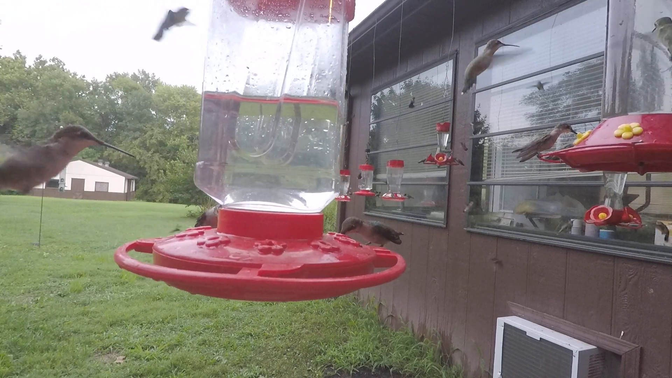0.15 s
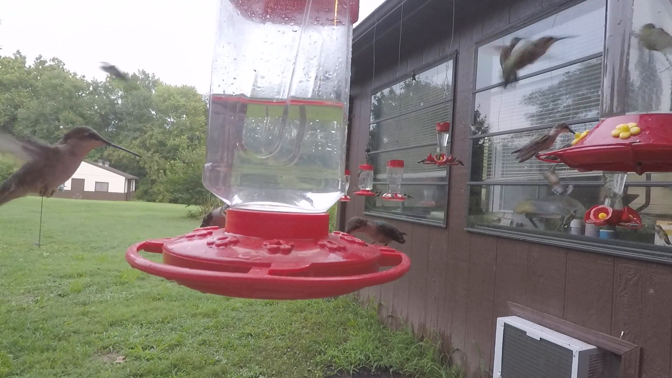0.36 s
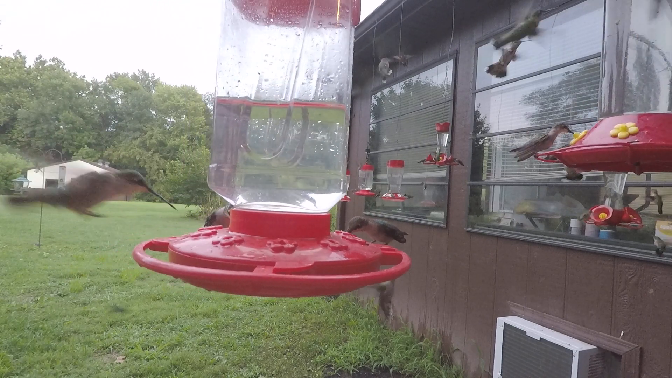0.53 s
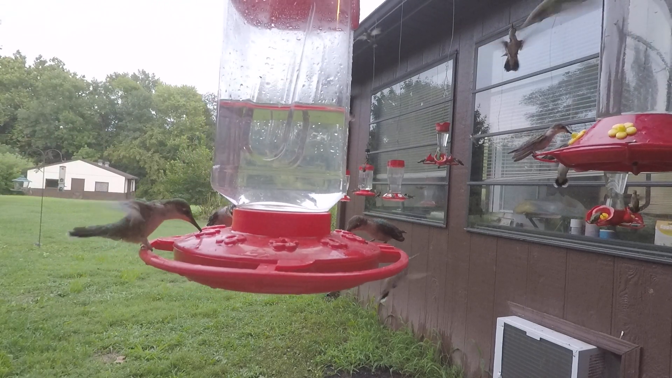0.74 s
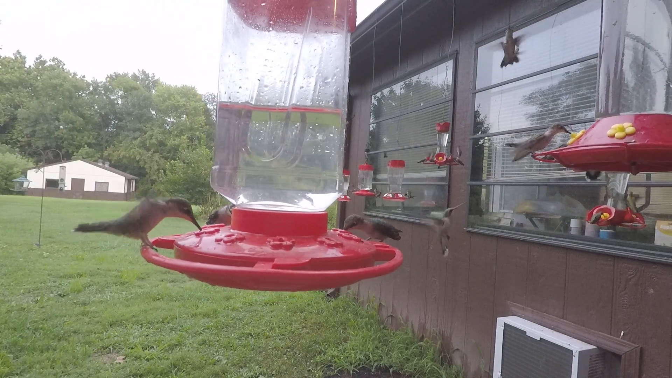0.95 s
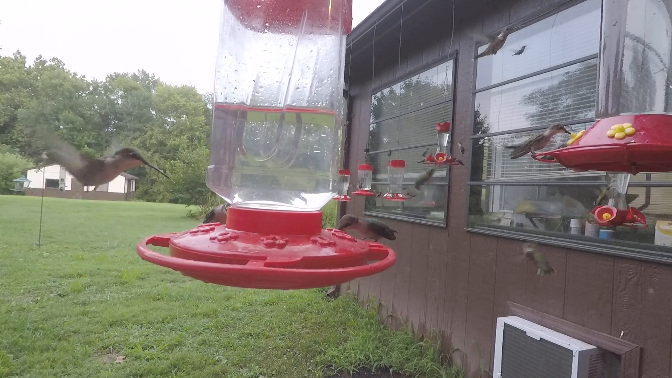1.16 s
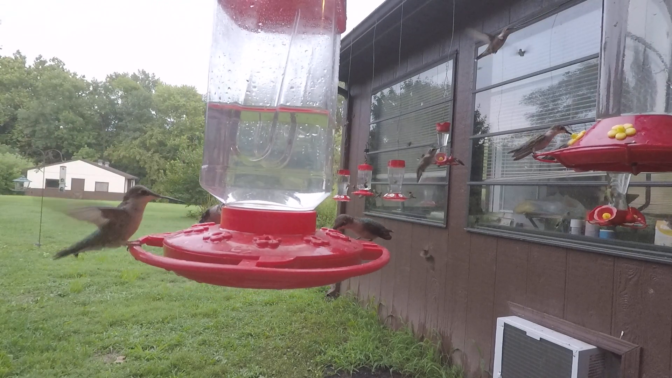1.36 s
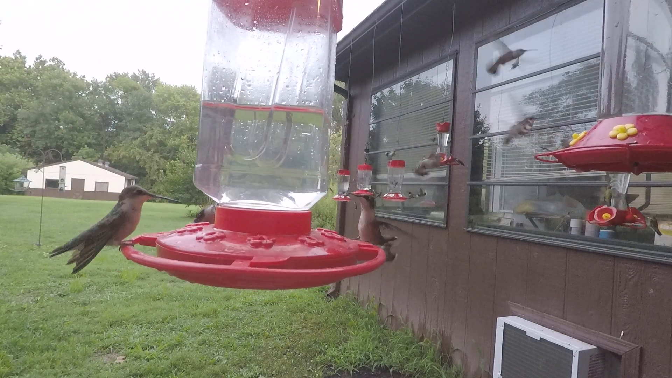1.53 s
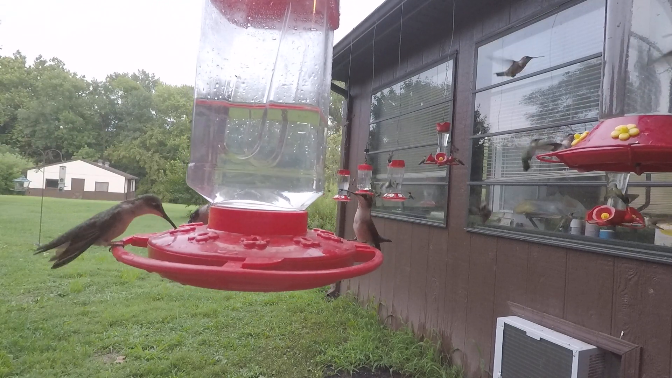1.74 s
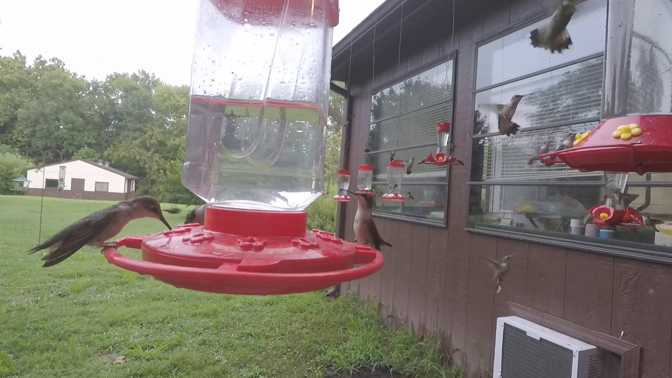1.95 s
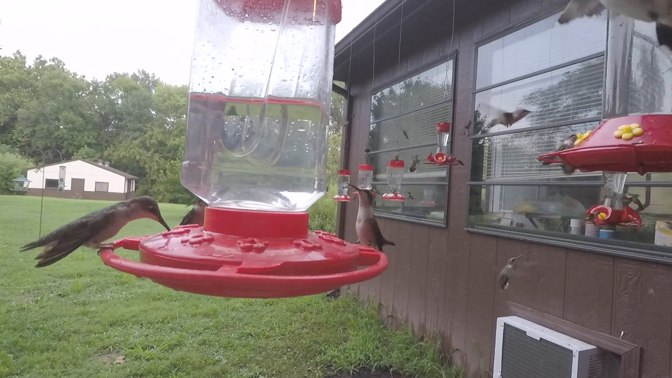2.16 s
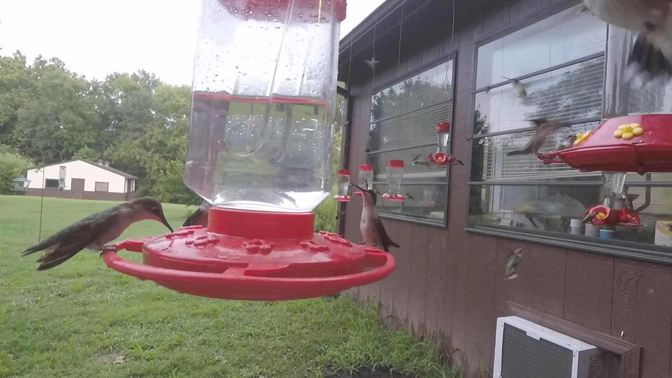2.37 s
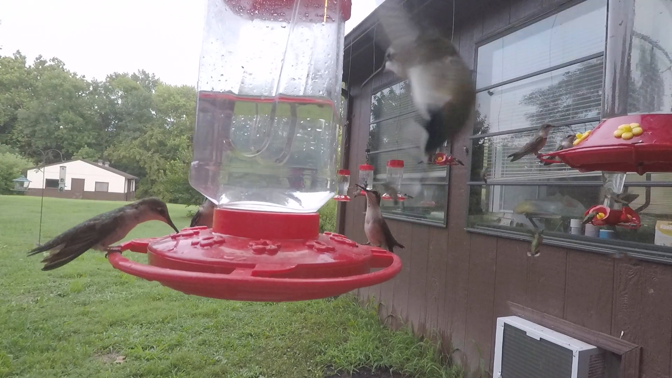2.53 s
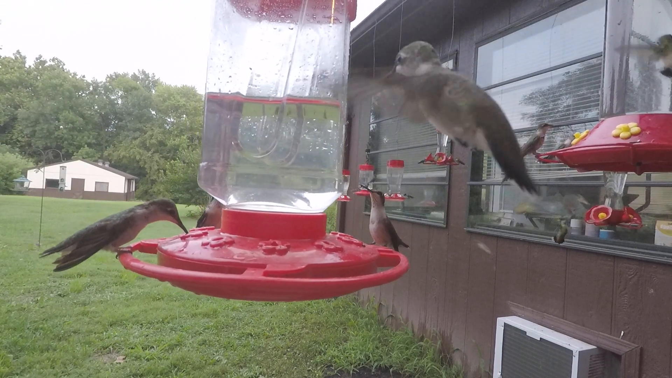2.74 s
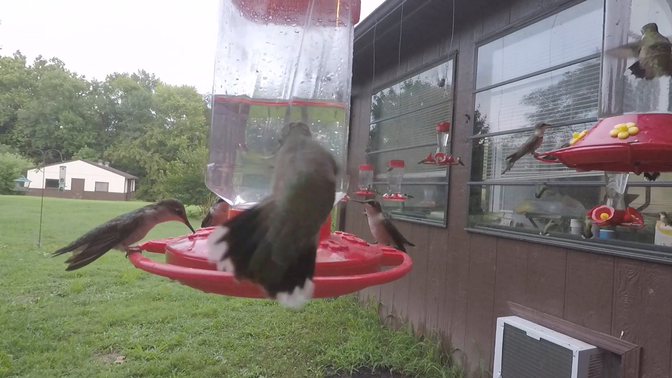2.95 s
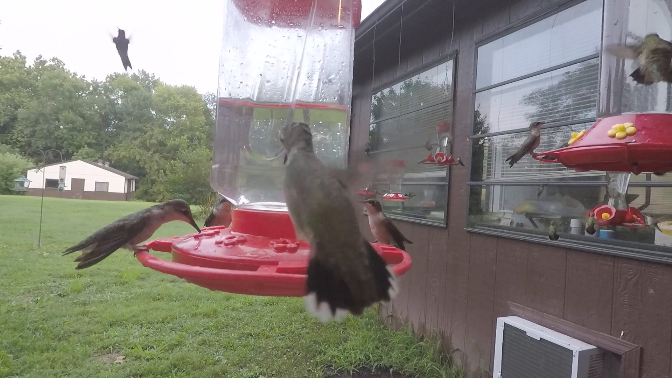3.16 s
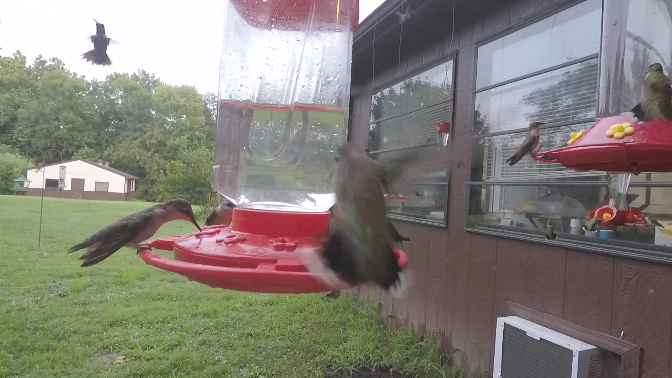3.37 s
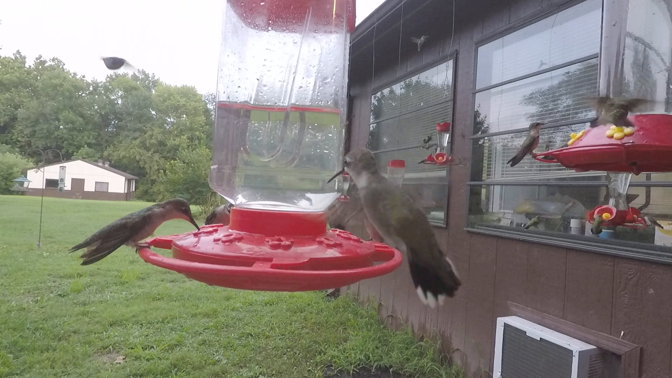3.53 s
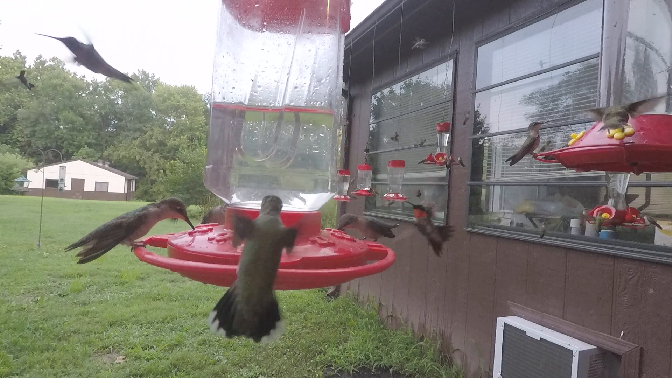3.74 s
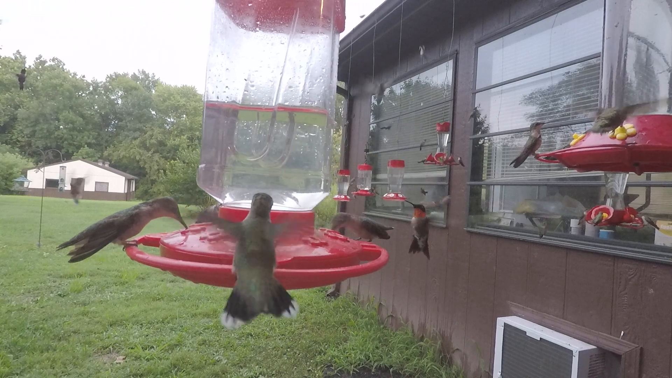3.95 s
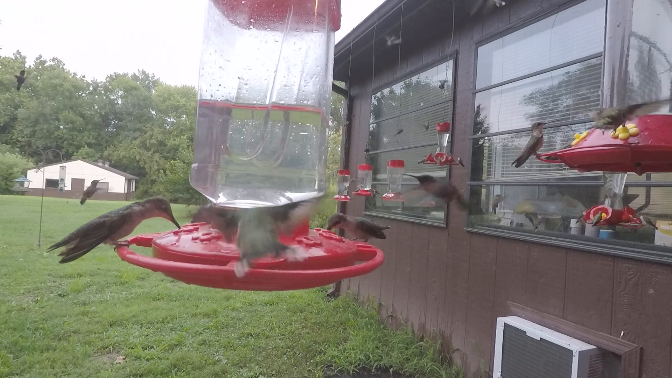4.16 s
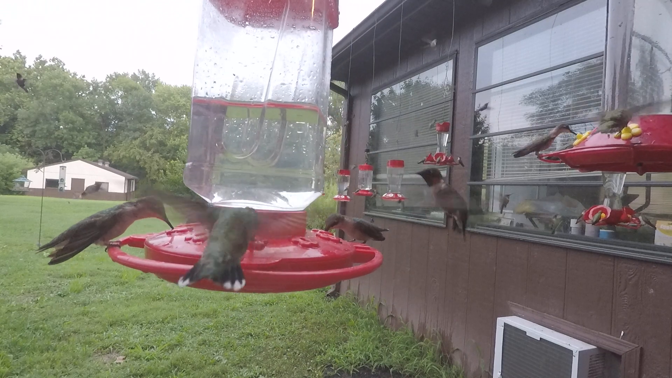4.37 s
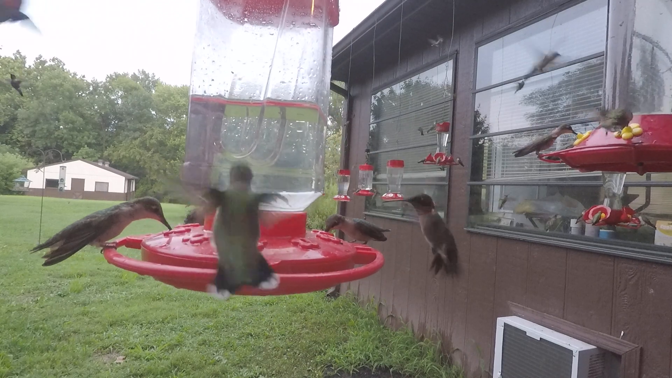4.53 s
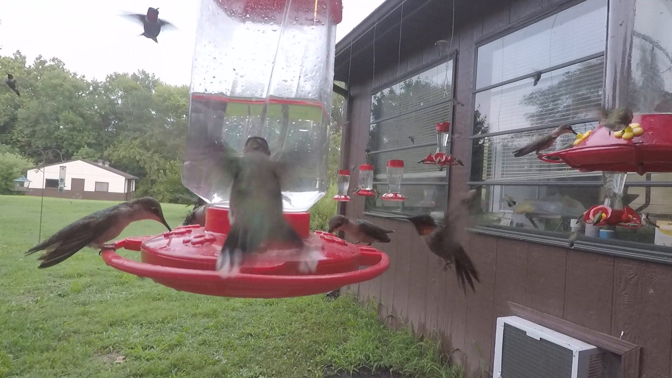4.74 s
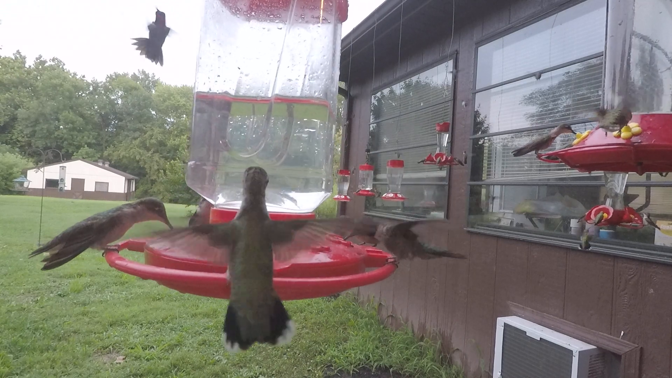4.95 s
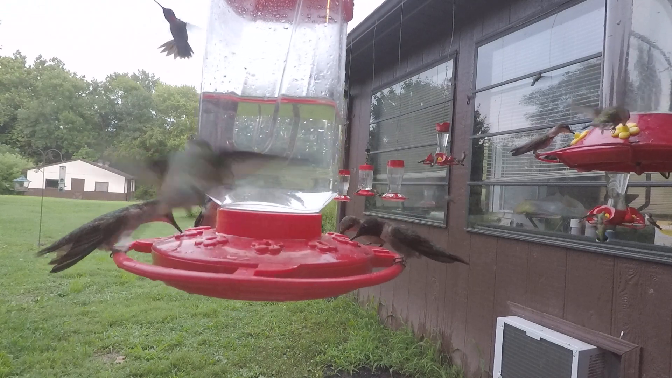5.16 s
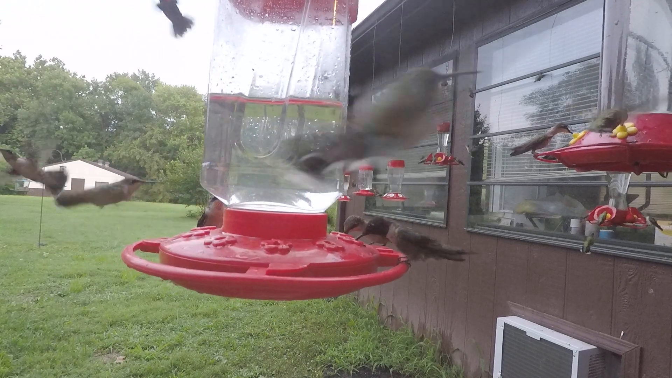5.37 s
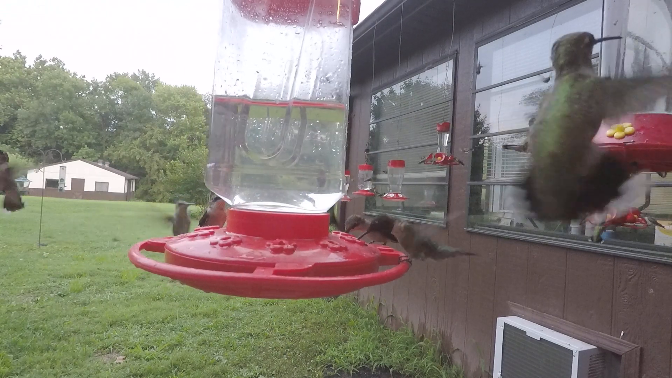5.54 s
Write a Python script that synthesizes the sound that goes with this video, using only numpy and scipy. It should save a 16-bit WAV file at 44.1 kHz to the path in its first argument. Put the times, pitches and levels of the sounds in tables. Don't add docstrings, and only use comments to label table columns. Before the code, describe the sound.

A backyard swarm of hummingbirds, heard close up beside a house wall in stereo. Fluctuating wing hum and faint steady insect hiss with cricket trills run throughout. From 0 to 0.6 s, quick hoarse chips chatter in a row, with small falling squeaks; sparser, softer chips follow until 1.6 s. The low end is thin here. Around 1.9 to 2.2 s come high thin whistles, a short rattle, dry pops and a harsh buzz. From 2.2 to 2.8 s a louder chatter run arrives while the bass opens. After about 2.5 s, deep wingbeats and buffeting air from a near hoverer dominate, strongest from 2.9 s and wavering in pitch. Buzzes, rattles and whistles recur around 3.0 to 3.6 and 4.0 to 4.5 s, with bright chips at 4.3 and 4.7 s beside another clear whistle. The wing throb continues under sparse chips until the abrupt end at 5.6 s.

```python
import sys
import numpy as np
from scipy import signal
from scipy.fft import rfft, irfft, next_fast_len
from scipy.io import wavfile
from scipy.ndimage import uniform_filter1d

SR = 44100
rng = np.random.default_rng(int(sys.argv[2]) if len(sys.argv) > 2 else 0)


def natural_amplitude(level_db):
    exponent = np.asarray(level_db, float) / 20
    return 10 ** exponent


def pcm_store(signal):
    levels = np.round(np.clip(np.atleast_2d(signal), -1, 1) * 32767)
    wavfile.write(sys.argv[1], SR, levels.astype(np.int16).T)


N = 246959
T = np.arange(N) / SR
FAST = next_fast_len(N)
HZ = np.arange(FAST // 2 + 1) * SR / FAST


def level(x, db):
    return x * natural_amplitude(db) / np.sqrt(np.mean(x ** 2))


def colour(x, points):
    hz, db = np.transpose(points)
    gain = natural_amplitude(np.interp(np.log(HZ + 1), np.log(hz), db))
    return irfft(rfft(x, FAST) * gain, FAST)[..., :N]


def walk(rate):
    k = int(SR / rate)
    steps = np.repeat(rng.standard_normal(N // k + 1), k)
    return 1.3 * uniform_filter1d(uniform_filter1d(steps, k), k)[:N]


def columns(table):
    s, *rest = np.transpose(table)
    since_start = T - s[0] + (s[0] == 0)
    until_end = s[-1] - T + (s[-1] > T[-1])
    gate = np.clip(np.minimum(since_start, until_end) / 0.0027, 0, 1)
    return [np.interp(T, s, c) for c in rest] + [gate]


def pan(x, db):
    return x * natural_amplitude(np.multiply.outer([.5, -.5], db * np.ones(len(x))))


def pair(side_db):
    mid, side = rng.standard_normal((2, N))
    return mid + natural_amplitude(side_db) * side * np.array([[1], [-1]])


def late_left(x, lag):
    return np.array([np.roll(x[0], lag), x[1]])


def burst(s, length, rise, fall):
    i = np.arange(max(int(s * SR), 0), min(int((s + length + fall) * SR), N))
    t = T[i] - s
    ending = np.clip((length + fall - t) / (2 * fall), 0, 1)
    return i, t, np.clip(t / rise, 0, 1) * np.sin(np.pi / 2 * ending) ** 2


def add(out, i, x, pan_db):
    left, right = pan(x, pan_db)
    out[0, i - 2 * (pan_db > -2.5)] += left
    out[1, i] += right


# time in seconds, wing hum in dB, downwash (pushed air) in dB.
SWARM = [(0, -30.5, -42), (.11, -38, -41), (.19, -34.5, -35), (.69, -31.5, -29), (.86, -35, -28),
         (1.04, -34, -21), (1.7, -35, -40), (1.78, -37.5, -42), (2.03, -30.5, -39), (2.2, -36, -25),
         (2.56, -32.5, -39), (2.9, -32, -33.5), (4.0, -34, -31), (4.74, -32, -31.5), (5.08, -37, -33),
         (5.18, -31.5, -28), (5.32, -29.5, -24), (5.44, -29.5, -29.5), (5.6, -31, -26.5)]
# pitch in Hz, strength in dB per Hz.
HUM = [(79, -33), (135, -1.5), (167, 1.5), (226, -6), (285, -8), (339, -13.5), (397, -12), (900, -44.5),
       (1170, -84), (1980, -120)]


def swarm(count=10):
    hum_db, wash_db, _ = columns(SWARM)
    cycle, wings = np.linspace(0, 1, 257), 0
    for hz, place_db in zip(rng.uniform(38, 55, count), np.linspace(-1.3, 1.3, count)):
        stroke = sum(np.cos(2 * np.pi * (k * cycle + rng.random())) for k in range(1, 15))
        turn = np.cumsum(hz * (1 + .05 * walk(3.2) + .03 * walk(15))) / SR
        bird = natural_amplitude(3.26 * walk(3.433)) * np.interp(turn % 1, cycle, stroke)
        wings = wings + pan(bird, 3.5 * place_db)
    rush = level(pair(3.6), -2.8)
    hum = colour(level(wings, -9) + rush, [(25, -22), (40, 3.0), (90, -4.5)] + list(HUM[1:]))
    wash = colour(pair(-11.5), [(12, 6), (30, 5.0), (50, 0.5), (95, 11.5), (140, -14.0), (300, -58.0)])
    heard = level(hum, 2.32) * natural_amplitude(hum_db) + level(wash, 0) * natural_amplitude(wash_db + 2.5 * walk(14))
    return heard * pan(np.ones(N), -1)


# pitch in Hz, strength in dB per Hz.
YARD = [(290, -31), (500, -1.5), (734, -6.5), (1060, -8.5), (1960, -9), (2800, -14), (5230, -18),
        (6300, -8), (7060, -13.5), (9120, -13.5), (10700, -22), (11400, -25), (12300, -26), (13400, -27.5),
        (14600, -32), (15000, -65)]
# pitch in Hz, opposed part in dB.
APART = [(300, 2.5), (1500, -2.5), (3700, -3), (5200, 0), (9000, -1), (14000, -0.5)]
HISS_RIGHT = np.array([[.15], [-.12]])


def yard():
    mid, side = rng.standard_normal((2, N))
    air = mid + colour(side, APART) * np.array([[1], [-1]])
    hiss = level(colour(air, [(300, -22)] + list(YARD[1:])), -46)
    hiss = hiss * natural_amplitude(0.87 * walk(14) + 0.91 * walk(3.82))
    shrillest = colour(hiss, [(4500, -34), (6000, 1), (10000, 4), (11500, -30)])
    trill = colour(pair(-12), [(8600, -53), (8900, 10), (9050, 12), (9250, -15), (9600, -54)])
    bouts = .65 + .45 * np.sin(2 * np.pi * 2.95 * T - .7)
    drone = colour(pair(1), [(5900, -54), (6200, -9), (6300, -31), (6420, -4), (6800, -53)])
    crickets = level(trill, -57.0) * bouts + level(drone, -69.0) * natural_amplitude(2 * walk(4.6))
    return pan(np.ones(N), -0.48) * (hiss - HISS_RIGHT * shrillest + crickets)


# pitch in Hz, strength in dB per Hz.
RASP = [(3100, -27.5), (5200, -7.5), (6500, -1.5), (7600, 3), (8400, -6.5), (9200, -4.5), (10800, -18),
        (12000, -22.5), (14500, -25), (15200, -43)]


def rasp(pulse_hz, depth, side_db):
    turn = np.cumsum(pulse_hz * (1 + .2 * walk(60))) / SR
    puffs = 1 - depth + depth * np.exp(-(turn % 1) / 0.48) * 1.5
    air = pair(side_db) * puffs * natural_amplitude(1.55 * walk(95))
    low = colour(air, [(1400, -5), (2500, 10.5), (3500, 13.5), (5600, -4.5), (6500, -40)])
    shrill = colour(air, [(7000, -25), (8300, 1), (10000, -1), (11500, -15.5), (14500, -26), (15200, -45)])
    return level(colour(air, RASP), 6.6), level(low, 0.99), level(shrill, 1.8)


# start in seconds, length in seconds, level in dB, lower part in dB, shrill part in dB.
BUZZES = [(-.01, 0.036, -36.5, -5.5, -10), (1.923, 0.074, -46, -23, 2), (1.967, .014, -37, -18, -8),
          (1.97, 0.064, -33, -12.5, -11), (2.038, 0.036, -48.5, 2, -11), (2.104, 0.051, -36.5, -8.5, -4.5),
          (2.29, 0.026, -45, -11, -6), (2.386, 0.046, -46.5, -8, -3), (2.805, 0.033, -47, -9, -11),
          (3.083, 0.08, -43, -15, 3), (3.185, 0.09, -46.5, -4.5, 1), (3.337, 0.021, -45, -11, -1),
          (3.374, 0.018, -51, -9, -11), (3.419, 0.03, -43.5, -22, -1), (3.483, 0.087, -46.5, -19, 5),
          (3.609, 0.056, -44.5, -3.5, -1), (4.033, 0.043, -43, -25, -6), (4.064, 0.057, -40.5, -14, -6),
          (4.177, 0.04, -37.5, -6.5, -3), (4.417, 0.021, -39, -14, -4), (4.432, 0.041, -35.5, -8.5, -7),
          (4.563, 0.044, -39, -5.5, -3), (4.832, 0.026, -50, 4, -2), (4.975, 0.056, -52.5, -9, -9),
          (5.116, 0.045, -50.5, 3, -21), (5.283, 0.083, -46.5, -10, -21), (5.4, .025, -51.5, 5.5, -11),
          (5.468, 0.035, -49, 0, -14)]


def buzzes():
    out, (top, low, shrill) = np.zeros((2, N)), rasp(pulse_hz=233.2, depth=0.58, side_db=-4.5)
    for s, length, db, low_db, shrill_db in BUZZES:
        i, t, shape = burst(s, length, rise=min(.017, .4 * length), fall=0.02)
        voice = top[:, i] + natural_amplitude(low_db - 3.5 + 120 * t) * low[:, i]
        voice = voice + natural_amplitude(shrill_db - 80 * t) * shrill[:, i]
        out[:, i] += shape * natural_amplitude(db - 35 * t) * voice
    return pan(np.ones(N), -2.1) * out


# start in seconds, peak in dB, starting pitch in Hz, lowest tone in dB.
CHATTER = [(.078, -29, 2190, -63), (.137, -28.5, 2184, -47), (0.211, -30, 2130, -48),
           (.268, -27.5, 2190, -42), (0.317, -32, 2350, -60), (0.358, -30, 2150, -44.5),
           (.447, -33.5, 2190, -49), (.522, -38.5, 2190, -57), (2.198, -26.5, 2274, -47.5),
           (2.264, -25.5, 2180, -49), (2.329, -27.5, 2153, -41.5), (2.355, -35, 1840, -47),
           (2.389, -36, 2090, -66), (2.415, -31, 2215, -45), (2.478, -32, 2136, -51),
           (2.532, -31.5, 2200, -50), (2.603, -29, 1976, -44), (2.681, -29.5, 2040, -48),
           (2.756, -33, 2150, -52), (2.912, -37.5, 2140, -68), (3.057, -36, 2294, -44),
           (4.741, -36.5, 2350, -46.5), (4.834, -40.5, 2160, -51.5), (5.488, -41, 2165, -56),
           (5.569, -33.5, 2170, -45), (.922, -37.5, 2106, -57), (1.078, -35.5, 2100, -52),
           (1.035, -41.5, 1990, -65), (.945, -53, 1970, -62)]
# start in seconds, peak in dB, starting pitch in Hz, lowest tone in dB.
CLEAR = [
    (.797, -38.5, 2040, -50.5),
    (1.262, -41.5, 2330, -52.5),
    (1.37, -37.5, 2180, -60),
    (2.843, -33.5, 1870, -46.5),
    (4.27, -26, 2520, -43.5),
    (4.329, -30.5, 2490, -45.5),
    (4.664, -26.5, 2556, -46),
]
# start in seconds, lowest tone in dB, starting pitch in Hz, left minus right in dB.
AWAY = [(.25, -44, 1950, 2), (0.344, -43.5, 1930, 6), (.597, -47, 1960, 0), (1.215, -47, 1810, 2),
        (1.808, -47.5, 2000, 0), (1.464, -46.5, 2030, 4), (2.874, -55, 1980, 2), (2.953, -49, 2210, 15),
        (3.145, -46.5, 2000, 2), (3.21, -47, 2190, 19), (4.295, -42.5, 1890, 10), (4.425, -42, 2000, 6),
        (4.445, -42.5, 2110, 16), (4.464, -40.5, 2080, 0), (5.229, -54, 1946, 1), (5.366, -41.5, 2176, -4),
        (5.425, -46.5, 1990, 0), (5.54, -42.5, 1920, -5)]


def chip_rows():
    rows = [(s, db, hz, low, db - 4.5, -3) for s, db, hz, low in CHATTER]
    rows += [(s, db, hz, low, db - 18, -3) for s, db, hz, low in CLEAR]
    return rows + [(s, low - 3, hz, low, low - 0.5, side) for s, low, hz, side in AWAY]


# pitch in Hz, gain in dB.
THROAT = [(3000, -19), (4600, -21), (5600, -9), (6400, -1), (8600, 0), (10000, -15), (13000, -36)]


def chips(head_s=.008, wobble=.12):
    out, (top, low, _) = np.zeros((2, N)), rasp(pulse_hz=321.6, depth=0.93, side_db=-3.0)
    shake = walk(1500)
    where, gain = np.transpose(THROAT)
    for s, db, hz, low_db, tail_db, pan_db in chip_rows():
        away = np.clip((low_db - db + 15) / 6, 0, 1)
        i, t, shape = burst(s, .02 - .006 * away, rise=.0035, fall=.005)
        late = np.clip(t - (1 - away) * head_s / 2, 0, 1)
        pitch = hz * (1 + .07 * away) * np.exp(-(6 + 550 * late + 12 * away) * late)
        turn = 2 * np.pi * np.cumsum(pitch * (1 + wobble * late / 0.0227 * shake[i])) / SR
        upper = sum(natural_amplitude(np.interp(k * pitch, where, gain)) * np.sin(k * turn) for k in range(2, 7))
        upper = upper * natural_amplitude(db - 5.5 + 3 * shake[i // 5])
        upper = upper * natural_amplitude((50 * away - 350) * np.clip(t - head_s, 0, 1))
        lowest = np.sin(turn) + natural_amplitude(-10) * np.sin(2 * turn)
        lowest = lowest * natural_amplitude(low_db - 1.5 * away - 60 * t + 3.5 * shake[i // 4])
        add(out, i, shape * (upper + lowest), pan_db)
        i, t, shape = burst(s + 0.0074, 0.019, rise=0.0047, fall=0.028)
        out[:, i] += pan(shape, pan_db) * natural_amplitude(tail_db - 8) * (top[:, i] + natural_amplitude(-8.5) * low[:, i])
    return out


# start in seconds, lowest tone in dB, starting pitch in Hz,
# speed of the fall per second, upper tones in dB.
SLIDES = [(.184, -38, 2300, 62, -36.5), (.316, -39, 2760, 107, -40), (.722, -44.5, 2560, 57, -47),
          (.766, -49, 2050, 70, -50), (.814, -41, 2063, 62, -41), (.985, -36.5, 2465, 54, -38),
          (2.345, -45, 2140, 45, -54), (2.42, -45, 2340, 45, -54), (1.39, -53, 2200, 50, -56),
          (1.462, -50, 2250, 55, -58), (1.428, -42.5, 2290, 41, -47), (1.522, -38, 2440, 59, -41),
          (3.644, -37, 2495, 37, -37), (3.694, -42.5, 2145, 62, -43)]
# start in seconds, level in dB, pitch in Hz.
POPS = [(2.054, -43, 2300), (2.064, -38, 2640), (2.074, -35, 1740), (2.087, -36, 2600), (2.097, -48, 2000),
        (2.31, -49, 1900), (2.372, -47, 1800), (2.965, -48, 1700), (.783, -52, 2400), (4.592, -41, 2450),
        (1.375, -43, 2130), (3.618, -37, 1930)]
# pitch in Hz, gain in dB.
OPEN_BILL = [(2800, -2), (4000, -5), (5200, -5), (6200, 2), (7800, 2.5), (10500, -14), (13000, -36)]


def slides():
    slide_s, pop_s, rest_hz = .014, .0042, 1106
    out, shake = np.zeros((2, N)), walk(300)
    where, gain = np.transpose(OPEN_BILL)
    rows = [(*row, slide_s) for row in SLIDES]
    rows += [(s, db, hz, 25, db - 12, pop_s) for s, db, hz in POPS]
    for s, db, hz, fall, upper_db, length in rows:
        i, t, shape = burst(s, length, rise=0.0011, fall=0.0045)
        pitch = rest_hz + (hz - rest_hz) * np.exp(-fall * t)
        turn = 2 * np.pi * np.cumsum(pitch * (1 + .02 * shake[i // 3])) / SR
        upper = sum(natural_amplitude(np.interp(k * pitch, where, gain)) * np.sin(k * turn) for k in range(2, 7))
        voice = natural_amplitude(db) * np.sin(turn) + natural_amplitude(upper_db) * upper
        add(out, i, shape * natural_amplitude(3.0 * shake[i]) * voice, -3)
    return out


# start in seconds, length in seconds, first pitch in Hz, last pitch in Hz, level in dB.
WHISTLES = [(1.877, .04, 6230, 6200, -32.5), (1.917, .018, 6400, 6470, -36), (1.945, .028, 6400, 6220, -32),
            (2.128, .018, 7330, 7400, -38), (2.148, .027, 7380, 7500, -24.5), (2.18, .018, 7500, 7600, -27),
            (2.7, .03, 5750, 5650, -45), (2.963, .03, 6550, 6620, -46), (2.993, .04, 6680, 6690, -36.5),
            (3.036, .03, 6600, 6600, -50), (3.485, .058, 6660, 6720, -38), (3.988, .022, 6280, 6250, -38),
            (4.01, .022, 6750, 7400, -34), (4.68, .022, 7120, 7160, -32), (4.703, .052, 7200, 7215, -27),
            (4.757, .012, 7200, 7180, -47), (5.158, .022, 7650, 7400, -48), (5.174, .014, 6700, 6050, -46)]
# pitch of that tone in Hz, level against the note in dB.
OCTAVE = [(12000, -15), (13400, -15), (14400, -17), (14800, -41)]


def whistles():
    steady_db, throb_hz = -23, 90
    out, slow, quick = np.zeros(N), walk(260), walk(700)
    for s, length, hz, end_hz, db in WHISTLES:
        flutter_db = .27 * (steady_db - db)
        i, t, shape = burst(s, length, rise=0.003 + .0012 * flutter_db, fall=0.005)
        throb = np.cos(2 * np.pi * throb_hz * t + 3.0)
        pitch = hz + (end_hz - hz) * t / length
        waver = 1 + 0.0025 * flutter_db * (quick[i] + 0.38 * throb)
        turn = 2 * np.pi * np.cumsum(pitch * waver) / SR
        octave_db = np.interp(2 * pitch, *np.transpose(OCTAVE)) - 2.0 * flutter_db - 1.0
        loudness = natural_amplitude(db + 5.0 + flutter_db * (0.56 * slow[i] + throb))
        out[i] += shape * loudness * (np.sin(turn) + natural_amplitude(octave_db) * np.sin(2 * turn))
    return pan(out, -2.5)


# start in seconds, length in seconds, beats per second, pitch in Hz, level in dB.
RATTLES = [
    (1.973, .05, 72, 6120, -32),
    (3.084, .065, 77, 6700, -36),
    (4.036, .085, 79, 7300, -32),
    (4.408, .062, 88, 6800, -30.5),
    (3.489, .03, 140, 9050, -44),
]


def rattles():
    out, chop, shake = np.zeros(N), np.ones(N), walk(900)
    for s, length, rate, hz, db in RATTLES:
        i, t, shape = burst(s, length, rise=0.0031, fall=0.011)
        beat = rate * t % 1
        strike = np.clip(beat / 0.095, 0, 1) * np.exp(-beat / 0.54) * 2.13
        pitch = hz * (1 - .5 * t - .025 * beat + .016 * shake[i])
        out[i] += shape * strike * natural_amplitude(db - 70 * t) * np.sin(2 * np.pi * np.cumsum(pitch) / SR)
        chop[i] *= 1 + .5 * shape * (strike - 1)
    return pan(out, -3.0), chop


# time in seconds, wingbeats in Hz, beat level in dB, snap of the stroke in dB.
HOVER = [(2.3, 42.37, -58, 3), (2.53, 45.7, -29.5, 8.5), (2.63, 42.62, -37, 10.5), (2.82, 40.32, -45.5, 14),
         (2.93, 45.64, -26.5, 4.5), (3.01, 42.57, -27.5, 1.5), (3.36, 43.81, -26.5, 0),
         (3.59, 41.99, -32, 1), (3.77, 48.16, -25.5, -5.5), (4.03, 49.79, -32.5, -1),
         (4.11, 49.73, -30, -2), (4.39, 52.09, -37.5, -2), (4.53, 48.86, -28.5, -3.5),
         (4.65, 46.71, -28.5, -1), (4.88, 47.44, -28, -3.5), (5.14, 49.88, -27.5, -8.5),
         (5.4, 42.7, -34.5, 7), (5.6, 40.66, -34, 6.5)]
# multiple of the beat, level against the beat in dB, share of the snap.
STROKE = [(2, -10, 0.14), (3, -6, 0.49), (4, -19.5, 0.84), (5, -13.5, 1.37), (6, -25, 0.19),
          (7, -21.5, 0.83)]


def hover():
    hz, beat_db, snap_db, gate = columns(HOVER)
    turn = 2 * np.pi * np.cumsum(hz * (1 + 0.01228 * walk(18))) / SR
    tones = [(0.99, beat_db)]
    tones += [(int(round(k)), beat_db + share * snap_db + db) for k, db, share in STROKE]
    return gate * sum(np.sqrt(2) * natural_amplitude(db + 1.4 * walk(30)) * np.cos(k * turn) for k, db in tones)


def wall(x, t60_s=0.11, wet_db=-5):
    t = np.arange(int(.2 * SR)) / SR
    fade = np.exp(-np.log(1000) * t / t60_s) * (t > .0008)
    tail = level(rng.standard_normal((2, len(t))) * fade, wet_db)
    return x + signal.fftconvolve(x, tail / np.sqrt(len(t)), axes=1)[:, :N]


def scene():
    notes, chop = rattles()
    calls = chips() + slides() + whistles() + notes + chop * buzzes()
    calls = natural_amplitude(-4.5) * wall(calls)
    wings = swarm() + pan(hover(), -1)
    return wings + late_left(calls, 1) + late_left(yard(), 11)


# time in seconds, bass gain in dB.
LOW_CUT = [
    (0, -25),
    (.06, -44),
    (1.95, -26),
    (2.07, -22),
    (2.2, -13.5),
    (2.45, -7),
    (2.55, 1.5),
    (5.6, 4.5),
]


def wind_filter(x):
    bass = colour(x, [(124, 0), (140, -30.5)])
    gain_db, _ = columns(LOW_CUT)
    return x - (1 - natural_amplitude(gain_db)) * bass


# pitch in Hz, share of quiet patches muted in the
GAPS = [(2500, .02, .05), (3800, .12, .5), (5000, .06, .06), (10700, .04, .04), (11400, .7, .7),
        (12200, .48, .48), (13000, .5, .5), (14800, .6, .6)]


def starve(x):
    patch_hz, patch_s, pass_db = 220, .07, 8
    mid_side = np.array([x[0] + x[1], x[0] - x[1]]) / 2
    hz, t, z = signal.stft(mid_side, SR, nperseg=1024, boundary="even")
    field = rng.standard_normal(z.shape[1:]) + .3 * rng.standard_normal(z.shape)
    for size, axis in ((patch_hz / hz[1], 1), (patch_s / (t[1] - t[0]), 2)):
        field = uniform_filter1d(field, int(size), axis=axis)
    rank = field.ravel().argsort().argsort().reshape(z.shape) / field.size
    where, *share = np.transpose(GAPS)
    share = np.array([np.interp(hz, where, s, left=0) for s in share])[..., None]
    busy = np.interp(t, T, columns(LOW_CUT)[0]) > 0
    share = share + np.outer(np.clip((hz - 13000) / 1500, 0, 1), busy) * .35
    power = uniform_filter1d(uniform_filter1d(abs(z) ** 2, 5, axis=1), 3, axis=2)
    quiet = power < natural_amplitude(2 * pass_db) * np.median(power, axis=2, keepdims=True)
    muted = (rank < share) & quiet
    mid, side = signal.istft(z * ~muted, SR)[1][:, :N]
    return np.array([mid + side, mid - side])


def roll_off(x):
    return signal.sosfilt(signal.butter(12, 15100, fs=SR, output="sos"), x)


def record(dry):
    rumble = level(colour(pair(-25), [(15, -3), (40, 1), (130, -13), (200, -55)]), -68.0)
    ending = np.clip((T[-1] - T) / .004, 0, 1)
    mix = ending * starve(wind_filter(dry) + rumble)
    return roll_off(mix)


dry = scene()
out = record(dry)
pcm_store(out)
```